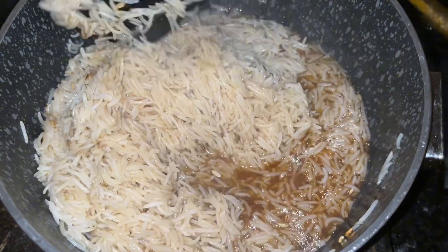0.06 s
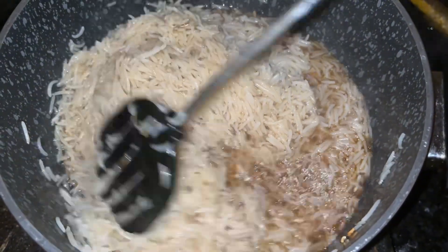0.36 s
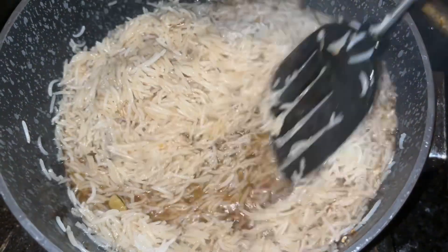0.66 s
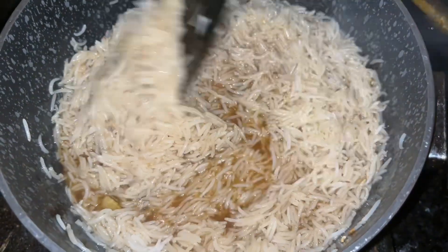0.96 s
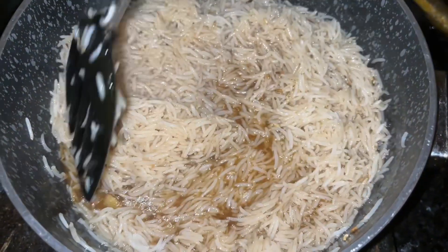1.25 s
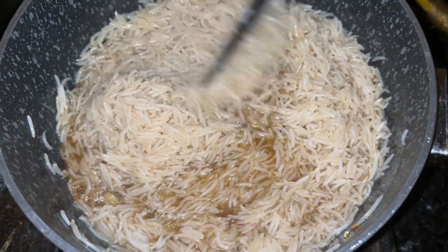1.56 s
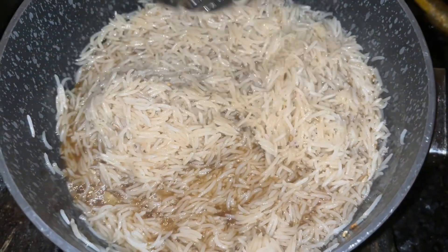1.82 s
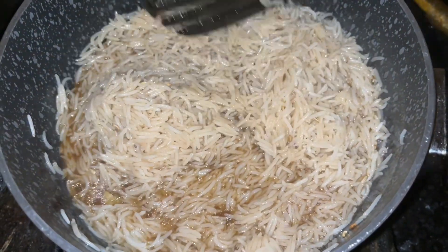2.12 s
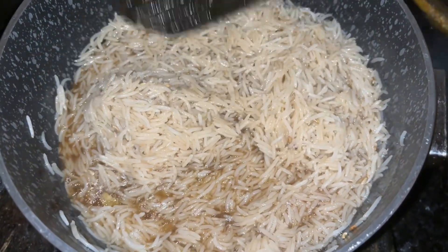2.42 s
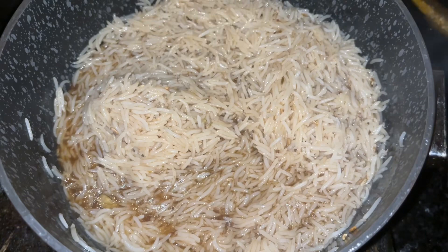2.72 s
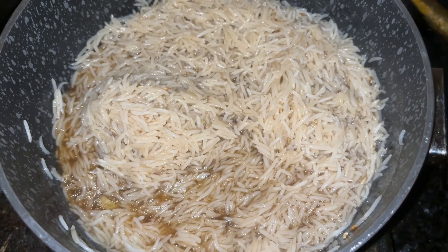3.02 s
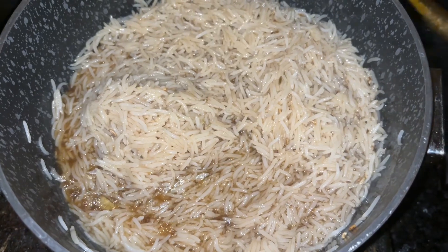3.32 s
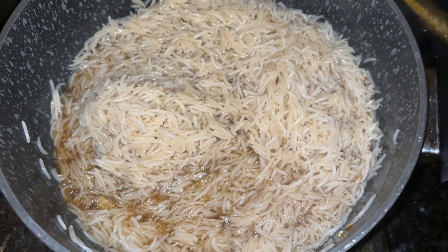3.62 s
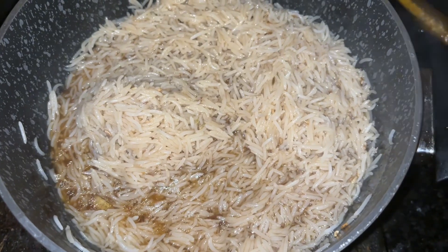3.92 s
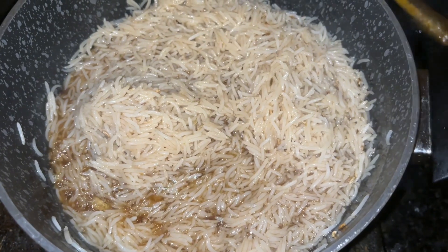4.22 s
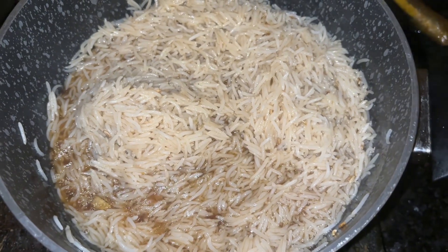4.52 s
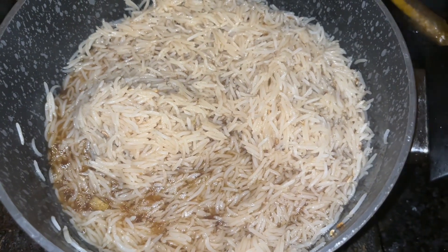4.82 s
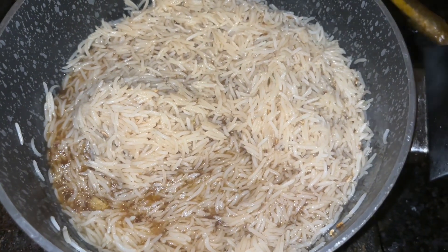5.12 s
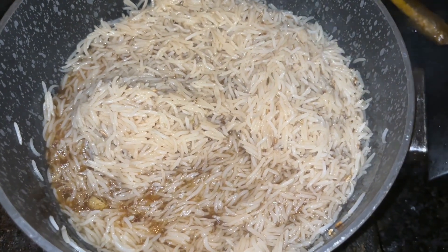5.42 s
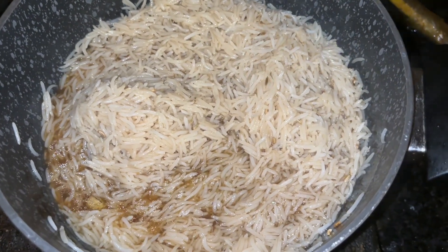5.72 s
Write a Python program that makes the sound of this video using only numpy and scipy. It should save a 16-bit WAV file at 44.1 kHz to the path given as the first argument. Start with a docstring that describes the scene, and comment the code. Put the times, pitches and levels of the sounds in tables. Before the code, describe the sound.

A spatula stirs rice through syrup in a pan, with soft wet crackles, sticky pops and light scrapes. It then raps the rim four times, loud and even, making the pan ring briefly. After a pause it is put down on a dish with a few quick clinking knocks. A low hum, the stove's rush and a faint fizz continue underneath, heard close up in a small, hard-walled kitchen.

```python
"""Wet rice crackles, pops and scrapes as a slotted spatula stirs it through syrup in a nonstick pan.
The syrup fizzes and ticks as bubbles burst, over the rush of the stove and a low wavering hum.
Four raps on the rim shed the grains: each impact excites the modes of blade and pan. The spatula is
then put down on a dish with a few clinking knocks, and the small hard-walled kitchen reverberates."""
import sys
import numpy as np
from scipy import signal
from scipy.fft import rfft, irfft, next_fast_len
from scipy.io import wavfile
from scipy.ndimage import uniform_filter1d

SR = 44100
rng = np.random.default_rng(int(sys.argv[2]) if len(sys.argv) > 2 else 0)


def wav_record(signal):
    """Record a signal, one row per channel, as 16-bit PCM in the file named by sys.argv[1]."""
    frames = np.transpose(np.atleast_2d(signal))
    bounded = np.clip(frames, -1, 1)
    # unit amplitude maps onto the largest positive 16-bit level
    quanta = np.round(bounded * 32767).astype(np.int16)
    wavfile.write(sys.argv[1], SR, quanta)


N = 262836
TIME = np.arange(N) / SR
AGE = TIME[:SR]  # the second after a blow
STIR_END_S = 2.05


def amp(db):
    """Decibels as an amplitude ratio."""
    return 10 ** (np.asarray(db) / 20)


def unit(x):
    """Normalisation to rms 1."""
    return x / np.sqrt(np.mean(x ** 2) + 1e-20)


def read(points, hz):
    """Linear interpolation on a log-frequency axis."""
    f, value = np.transpose(points)
    return np.interp(np.log(hz + 1), np.log(f + 1), value)


def add(mix, start_s, sound):
    """Superposition: a sound joins the mix at its start time."""
    part = mix[:, max(round(start_s * SR), 0):][:, :sound.shape[1]]
    part += sound[:, :part.shape[1]]


def shape(x, db_at):
    """Zero-phase filtering by a gain in dB, given as a function of frequency."""
    size = next_fast_len(x.shape[-1] + 4096)
    gain = amp(db_at(np.fft.rfftfreq(size, 1 / SR)))
    return irfft(rfft(x, size) * gain, size)[..., :x.shape[-1]]


def colour(pair, spectrum):
    """Spectral shaping of a mid/side pair, rms 1."""
    return unit(shape(pair, lambda hz: read(spectrum, hz)))


def noise(spectrum, size):
    """Coloured noise, independent in mid and side."""
    return colour(rng.choice([-1., 1.], (2, size)), spectrum)


def drift(rate_hz, size):
    """Slow random fluctuation: low-passed noise, rms 1."""
    return unit(shape(rng.standard_normal(size), lambda hz: -20 * np.log10(1 + (hz / rate_hz) ** 4)))


def fade(t60, rise):
    """A quick onset, then exponential damping by 60 dB in t60 seconds."""
    return (1 - np.exp(-AGE / rise)) * np.exp(-np.log(1000) * AGE / t60)


def treble(x, db):
    """A high shelf that reaches half its dB gain at 7500 Hz."""
    return shape(x, lambda hz: db * hz ** 2 / (hz ** 2 + 7500 ** 2))


def band_pass(x, hz, spread):
    """A pass band round hz, of relative half-width spread."""
    return shape(x, lambda f: -20 * np.log10(1 + ((f - hz) / (spread * hz)) ** 2))


def resonant(x, peaks):
    """Fixed resonances, as rows of pitch_hz, width_hz, gain_db."""
    return shape(x, lambda hz: sum(db / (1 + (2 * (hz - f) / width) ** 2) for f, width, db in peaks))


def favour(x, hz, db, spread):
    """One resonant peak or dip, of relative half-width spread."""
    return resonant(x, [(hz, 2 * spread * hz, db)])


def tiny_bursts(per_s, size_db, cycles, pitches=32):
    """Damped oscillation: tiny pockets of liquid burst at random, each ringing for a few cycles."""
    out = np.zeros((2, N))
    t = AGE[:512]
    for hz in np.linspace(2200, 15000, pitches):
        sizes = amp(size_db * np.minimum(rng.exponential(1, N), 4))
        onsets = rng.random(N) < per_s / pitches / SR
        click = np.sqrt(hz) * np.sin(2 * np.pi * hz * t) * np.exp(-hz * t / cycles)
        clicks = signal.oaconvolve(sizes * onsets, click)[:N]
        out += [clicks, rng.choice([-1, 1]) * np.roll(clicks, 1)]
    return out


# spectrum of the wet crackle: pitch_hz, level_db
CRACKLE_SPECTRUM = [(1500, 7.5), (2800, 5), (3800, 0.5), (6000, 2), (8300, 2), (13000, 3.5), (16000, 1.5)]
# resonances of pan and blade while stirring: pitch_hz, width_hz, gain_db
STIR_RESONANCES = [(2190, 90, 4.5), (3100, 400, 3.5), (5070, 130, 7.5)]
# strokes through the rice: start_s, length_s, level_db, treble_db
SPATULA_STROKES = [(0.174, 0.46, -57, -5.5), (0.755, 0.27, -62, -9), (1.07, 0.15, -72.5, -6),
                   (1.275, 0.16, -66, 2.5), (1.457, 0.094, -63, 0.5), (1.75, 0.53, -71.5, 1)]


def rice_crackle(attack_s=0.025, sag_db_per_s=9.5, release_s=0.074):
    """Amplitude modulation: the crackle follows the blade as it digs in, eases and lifts."""
    bursts = tiny_bursts(per_s=3200, size_db=5.2, cycles=2.4)
    clumps = bursts * amp(2 * drift(35, N))
    crackle = resonant(colour(clumps, CRACKLE_SPECTRUM), STIR_RESONANCES)
    settling = np.clip((STIR_END_S - TIME) / .1, 0, 1)  # rice shifts between strokes
    out = amp(-69) * crackle[:, ::-1] * settling
    for start, length, db, treble_db in SPATULA_STROKES:
        age = np.maximum(TIME - start, 0)
        push = np.minimum(age / attack_s, 1) * amp(-sag_db_per_s * age)
        lift = np.exp(-np.maximum(age - length, 0) / release_s)
        out += amp(db) * treble(crackle, treble_db) * push * lift
    return out


def snap(hz, t60, spread):
    """A transient: a damped burst of band-limited noise."""
    envelope = fade(t60, rise=.0001)
    burst = band_pass(rng.standard_normal((2, SR)), hz, spread) * envelope
    burst *= np.linalg.norm(envelope) / np.linalg.norm(burst, axis=1, keepdims=True)
    return burst * amp([[-5], [-7]])


def small_pops(per_s=12, slots=40, low_hz=4460, high_hz=13800):
    """A random point process of lesser pops during the stirring: start_s, level_db, pitch_hz."""
    slot_s = STIR_END_S / slots
    for k, (when, luck, size, pitch) in enumerate(rng.random((slots, 4))):
        if luck < slot_s * per_s:
            yield (k + when) * slot_s, -46.5 - 5 * size, low_hz + pitch * (high_hz - low_hz)


# the loudest sticky pops and bursting bubbles: start_s, level_db, pitch_hz
SYRUP_POPS = [(0.1286, -43, 11100), (0.1675, -43, 10900), (0.2235, -50, 2900), (0.2848, -40.5, 4840),
              (0.298, -36, 12000), (0.383, -37.5, 12400), (0.4394, -48, 3100), (0.4683, -39, 3140),
              (0.4686, -46, 4700), (0.5292, -47, 6130), (0.7337, -42, 13000), (0.8051, -43, 6900),
              (0.811, -45.5, 3100), (0.8739, -43.5, 5400), (0.965, -50, 12900), (1.07, -44, 13000),
              (1.1199, -41, 12500), (1.3204, -36.5, 11200), (1.3513, -45.5, 3250), (1.6192, -45, 13600),
              (1.6412, -42.5, 11300), (1.65, -38, 10900), (1.721, -41.5, 12500), (1.8377, -50, 4970),
              (1.841, -41.5, 12300), (4.5846, -51, 6350), (4.603, -49, 12460), (4.7448, -42.5, 6400),
              (4.9299, -38.5, 11900)]


def syrup_pops(t60_cycles=110, blur_hz=36000):
    """Equal damping per cycle: big low pockets ring longer and hint at a note; small ones click."""
    out = np.zeros((2, N))
    for start, db, hz in [*SYRUP_POPS, *small_pops()]:
        add(out, start, amp(db) * snap(hz, t60_cycles / hz, spread=hz / blur_hz))
    return out


# grains dragged along the pan: start_s, length_s, level_db, pitch_hz, spread_ratio
GRAIN_SCRAPES = [(0.278, 0.025, -55, 2580, 0.44), (0.287, 0.045, -58, 12000, 0.34),
                 (0.485, 0.1, -53.5, 827, .015), (0.587, 0.048, -61, 4200, .4),
                 (0.63, 0.03, -51.5, 836, 0.017), (0.801, 0.041, -58, 13000, 0.65),
                 (0.946, 0.054, -61, 13000, 0.36), (1.40, 0.052, -62, 2210, 0.032),
                 (1.608, 0.043, -57.5, 13000, 0.44)]


def grain_scrapes(slips_per_s=500):
    """Stick-slip friction of grains under the blade; a narrow band sings at a mode of the pan."""
    out = np.zeros((2, N))
    for start, length, db, hz, spread in GRAIN_SCRAPES:
        kicks = rng.choice([-1., 1.], (2, SR)) * rng.uniform(0.36, 1, SR)
        slips = kicks * (rng.random(SR) < slips_per_s / SR)
        swell = np.sin(np.pi * np.minimum(AGE / length, 1) ** 0.46)
        add(out, start, amp(db) * unit(band_pass(slips, hz, spread)) * swell)
    return out


def wet_rice():
    """Reflection: pan wall and kitchen add a short, smooth echo to the sounds of the rice."""
    direct = rice_crackle() + grain_scrapes() + syrup_pops()
    response = rng.standard_normal((2, SR)) * fade(t60=0.31, rise=0.0032)
    response /= np.linalg.norm(response[0])
    echo = signal.fftconvolve(direct[:1], response, axes=1)[:, :N]
    return direct + amp(-6.5) * echo


# spectrum of the simmering syrup: pitch_hz, level_db
FIZZ_SPECTRUM = [(3000, -16), (8000, -10), (13000, 2), (16000, -0.5)]


def simmer(bubbles_per_s=5000):
    """Shot noise: tiny bubbles on the hot metal merge into a faint fizz."""
    impulses = rng.standard_normal((2, N)) * (rng.random(N) < bubbles_per_s / SR)
    return amp(-75.5) * colour(impulses, FIZZ_SPECTRUM)


# spectrum of the stove's rush: pitch_hz, level_db
RUSH_SPECTRUM = [(20, -3.5), (45, -2), (65, -1), (95, -2), (130, -12), (230, -14), (330, -19), (520, -25.5),
                 (1000, -30), (1500, -31.5), (2200, -37.5), (2900, -40), (3600, -49), (7500, -50),
                 (16000, -56.5)]
# hollow resonances in the rush: pitch_hz, width_hz, gain_db
RUSH_RESONANCES = [(407, 44.63, 7.5), (819, 80, 14), (1244.7, 137, 9), (1660, 70, 9), (2092, 70, 6.5),
                   (2597, 200, 11), (2990, 67, 11), (3723, 250, 9), (4600, 450, 5.5), (6976, 799, 8)]


def stove_rush():
    """Flow noise: steadily rushing air, coloured by hollow resonances."""
    return amp(-46 + 0.3 * drift(5, N)) * resonant(noise(RUSH_SPECTRUM, N), RUSH_RESONANCES)


# loudness of the low drone over time, strongest just after the raps: time_s, level_db
DRONE_LEVEL = [(0.0, -43.5), (1.314, -43.5), (1.4, -49), (1.95, -43), (2.68, -33.5), (3.87, -41),
               (4.06, -72), (4.14, -48), (4.79, -39.5), (5.02, -72.5), (5.11, -42), (5.96, -62)]
# a fan's thin tones: pitch_hz, level_db
FAN_TONES = [(99, -65.5), (197.5, -59.5), (247, -62.5)]


def hum(start_hz=51, end_hz=63.7, settle_s=1.7, waver_db=1.5):
    """Modulated sinusoids: a wavering drone creeps up in pitch and levels off beneath a fan's tones."""
    pitch = end_hz + (start_hz - end_hz) * np.exp(-TIME / settle_s)
    level_db = np.interp(TIME, *np.transpose(DRONE_LEVEL)) + waver_db * drift(8.2, N)
    tones = amp(level_db) * np.sin(2 * np.pi * np.cumsum(pitch) / SR)
    for hz, db in FAN_TONES:
        swing = amp(db + 0.853 * drift(9.1, N))
        tones += swing * np.sin(2 * np.pi * hz * TIME + 0.17 * drift(4.6, N))
    return np.sqrt(2) * tones * amp([[0], [-12]])


def ring(modes, rise, flutter_db=0):
    """Modal vibration: each blow weights the damped modes anew; loose contact makes them flutter."""
    out = np.zeros((2, SR))
    for (hz, db, t60), (luck, phase, lead) in zip(modes, rng.uniform(-0.9, 1, (len(modes), 3))):
        flutter = flutter_db * drift(77, SR) if flutter_db else 0
        swing = amp(db + 2 * luck + flutter) * fade(t60, rise)
        angle = 2 * np.pi * hz * AGE + np.pi * phase
        out += swing * np.array([np.sin(angle), np.cos(angle) * np.sign(lead) * amp(-1)])
    return out


# reverberation time of the kitchen: pitch_hz, t60_s
KITCHEN_DECAY = [(100, 0.7), (500, .42), (1500, 0.63), (4000, 0.64), (7000, 0.66), (9000, 0.45),
                 (14000, 0.22)]


def room_tail(spectrum, rise, uneven_db):
    """Diffuse reverberation: each band dies at its own rate, and the walls favour some pitches."""
    ripple = lambda hz: uneven_db * unit(uniform_filter1d(rng.standard_normal(len(hz)), size=60))
    diffuse = shape(noise(spectrum, SR), ripple)
    hz, t, bands = signal.stft(diffuse, SR, nperseg=256)
    decay = np.exp(-np.log(1000) * t / read(KITCHEN_DECAY, hz)[:, None])
    tail = signal.istft(bands * decay, SR, nperseg=256)[1]
    return tail[:, :SR] * (1 - np.exp(-AGE / rise))


# brief, dry modes of the blade: pitch_ratio, level_db, t60_s
BLADE_MODES = [(.4, -18, 0.025), (.82, -14, .014), (1, -5.5, .011), (1.3, -23.5, .008), (2.1, -29.5, .006)]
# modes of the pan: pitch_hz, level_db, t60_s
PAN_MODES = [(452, -27.5, .16), (517, -27, .18), (623, -28.5, .23), (691, -23, .17), (755, -32.5, .2),
             (838, -27, .08), (1245, -35, 0.16), (1570, -35, .23), (1762, -33, .21), (1982, -24, .15),
             (2207, -37, .2), (2369, -34, .2), (2890, -38.5, .24), (3047, -34.5, .3), (3105, -34.5, .26),
             (3590, -34.5, .22), (3817, -30.5, .23), (3949, -31.5, .23), (4400, -30, .14),
             (4533, -32.5, .2), (4780, -31, .17), (4936, -30.5, .3), (5098, -36, .28), (5238, -36.5, .28),
             (5406, -34, .27), (5955, -34.5, .28), (6164, -35, .25), (6638, -34, .23), (6858, -31.5, .23)]
# the pan rocking on the stove top: pitch_hz, level_db, t60_s
ROCKING_MODES = [(43.94, -28, 0.63), (76, -37, 0.34), (150.5, -28.5, 0.22), (180, -24, .22),
                 (251.6, -24.5, 0.16), (281, -21.5, 0.16), (340, -26.5, 0.12), (832, -29, 0.22)]
# spectrum of the blade's chatter on the rim: pitch_hz, level_db
CHATTER_SPECTRUM = [(100, -13), (300, 0.5), (700, 3.5), (1080, -5), (1900, 2), (2350, -3.5), (3300, -3.5),
                    (4800, 3.5), (7000, -1.5), (10000, -5), (13000, -26.5), (16000, -22)]
# spectrum of a rap's reverberation: pitch_hz, level_db
RAP_ECHO_SPECTRUM = [(60, -10.5), (110, -7), (180, -6), (290, -17.5), (400, -19), (820, -24), (1070, -30),
                     (1600, -25.5), (2300, -26), (3500, -26), (4200, -29.5), (5000, -24.5), (5700, -29),
                     (7000, -26.5), (8300, -29), (10000, -36), (13000, -32), (16000, -50.5)]
# raps on the rim: start_s, level_db, crack_hz, crack_db, rebound_delay_s, rebound_db, thud_db,
# pan_ring_db, crack_treble_db, tail_treble_db, spot_hz, spot_db
RIM_RAPS = [(2.0019, 1, 4720, -2.5, 0.0044, -3.5, -3, -4, -3, -5, 4900, 2.5),
            (2.1756, -4, 6835, -0.5, 0.0012, -12.5, 2, -4, 3.5, 6, 6700, 2.5),
            (2.3422, -2, 4780, 8, 0.0021, 3, 1.5, -0.5, -6.5, -11.5, 3020, 6),
            (2.5028, -1.5, 6780, 2.5, 0.001, 2.5, 1, -0.5, -5.5, -4.5, 6400, 3.5)]


def rim_raps():
    """Impact excitation: the blade cracks, chatters and rebounds; the pan rings and thumps the stove."""
    out = np.zeros((2, N))
    room = amp(-24) * room_tail(RAP_ECHO_SPECTRUM, rise=0.013, uneven_db=3)
    for (start, db, crack_hz, crack_db, rebound_s, rebound_db, thud_db,
         ring_db, crack_treble_db, tail_treble_db, spot_hz, spot_db) in RIM_RAPS:
        blade = [(ratio * crack_hz, level + crack_db, t60) for ratio, level, t60 in BLADE_MODES]
        crack = ring(blade, rise=0.0003) + amp(-12) * snap(12000, t60=0.014, spread=.25)
        chatter = amp(-15.5) * noise(CHATTER_SPECTRUM, SR) * fade(t60=0.062, rise=0.0004)
        pan = amp(ring_db) * ring(PAN_MODES, rise=0.0008, flutter_db=1.5)
        tail = favour(room + pan, spot_hz, spot_db, spread=.12)  # the spot struck favours one band
        rebound = noise(CHATTER_SPECTRUM, SR) * fade(t60=0.004, rise=0.0004)
        add(out, start, amp(db) * treble(crack + chatter, crack_treble_db))
        add(out, start, amp(db) * treble(tail, tail_treble_db))
        add(out, start + rebound_s, amp(db + rebound_db) * treble(rebound, crack_treble_db))
        add(out, start + 0.015, amp(db + thud_db) * ring(ROCKING_MODES, rise=.001))
    return out


# spectrum of a knock on the dish: pitch_hz, level_db
KNOCK_SPECTRUM = [(100, -5), (200, 0.5), (280, -6.5), (470, -8), (1300, -2.5), (1750, -10.5), (2300, -7),
                  (3400, -22), (4800, -20), (5600, -26), (7000, -38.5), (10000, -43), (16000, -47)]
# modes of the spatula's metal handle: pitch_hz, level_db, t60_s
HANDLE_MODES = [(1916, -34, 0.23), (2544, -34, 0.12), (3250, -37, 0.11), (4070, -49, 0.18),
                (4620, -48, 0.19), (5000, -47, 0.14)]
# modes of the dish on the counter: pitch_hz, level_db, t60_s
DISH_MODES = [(196.5, -28.5, 0.23), (455, -24.5, 0.1), (522, -37, 0.28), (603, -34, 0.23), (658, -36, 0.17),
              (900, -32, 0.13), (1034, -28, 0.091), (1294, -20, 0.048), (1400, -43, 0.39),
              (1570, -37.5, .43), (1800, -38.5, 0.18), (2050, -31.5, 0.11), (2380, -30.5, 0.064),
              (3800, -56, 0.65), (3850, -52.5, 0.43), (4640, -42, 0.14), (4920, -40, 0.2),
              (5180, -55.5, 0.49), (6030, -47, 0.071), (7140, -50, 0.13)]
# the spatula put down: start_s, level_db, rise_s, handle_db, dish_db, treble_db, body_db
DISH_KNOCKS = [(4.054, -13.5, 0.011, 7.5, -2, -24, 6.5), (4.218, -5, 0.0028, -3, -6, 7, 0.5),
               (4.2295, -7.5, 0.0006, -2, -2, 1, -1.5), (4.316, -0.5, 0.00089, -6.5, 0, 6, -1.5)]


def dish_knocks():
    """Free vibration: the handle clinks at the first touches; the last blow rings the dish more."""
    out = np.zeros((2, N))
    room = amp(-34) * room_tail(KNOCK_SPECTRUM, rise=0.0051, uneven_db=3.5)
    for start, db, rise, handle_db, dish_db, treble_db, body_db in DISH_KNOCKS:
        blow = amp(-26) * noise(KNOCK_SPECTRUM, SR) * fade(t60=0.06, rise=rise)
        handle = amp(handle_db) * ring(HANDLE_MODES, rise)
        dish = amp(dish_db) * ring(DISH_MODES, rise, flutter_db=1.5)
        knock = treble(blow + room + handle + dish, treble_db)
        add(out, start, amp(db) * favour(knock, hz=317, db=body_db, spread=1))
    return out


# balance of impacts a little to one side: pitch_hz, left_minus_right_db
IMPACT_BALANCE = [(250, 0), (480, 4), (1300, 2), (1900, -1.5), (3300, 3), (7000, -2.5), (12000, 0)]


def off_centre(pair):
    """Level difference between channels tips a mid/side pair left or right, band by band."""
    left = shape(pair[0] + pair[1], lambda hz: read(IMPACT_BALANCE, hz) / 2)
    right = shape(pair[0] - pair[1], lambda hz: -read(IMPACT_BALANCE, hz) / 2)
    return np.array([left + right, left - right]) / 2


def scene():
    """Superposition of all sources, as mid and side."""
    impacts = off_centre(rim_raps() + dish_knocks())
    return wet_rice() + simmer() + stove_rush() + hum() + impacts


# a microphone pair whose ports swing in and out of phase in the treble: pitch_hz, mid_db, side_db
PAIR_RESPONSE = [(22, -27, -44.5), (38.1, -2, -27), (60, -1, -29.5), (106, -1, -12.5), (199.7, -0.5, -11.5),
                 (380, 0, -7.5), (700, 1, -3.5), (1140, 1, -3), (1600, -2, 1), (2400, -2.5, -6.5),
                 (4500, -1.5, -6.5), (5787, -1.5, -2), (6640, 0.5, -5.5), (8930, -2.5, -1),
                 (9800, -20.5, 5), (11030, -1.5, 0.5), (13300, 2, -17), (14300, -2, -5), (15500, -16.5, 3)]


def record(dry, full_scale=.92, cutoff_hz=16200):
    """Transduction: the microphones colour mid and side; left and right are clipped and low-passed."""
    hz, mid_db, side_db = np.transpose(PAIR_RESPONSE)
    mid = shape(dry[0], lambda f: read(np.c_[hz, mid_db], f))
    side = shape(dry[1], lambda f: read(np.c_[hz, side_db], f))
    clipped = np.clip([mid + side, mid - side], -full_scale, full_scale)
    low_pass = signal.firwin(511, cutoff_hz, window=("kaiser", 9), fs=SR)
    return signal.oaconvolve(clipped, low_pass[None], "same")


dry = scene()
out = record(dry)
wav_record(out)
```